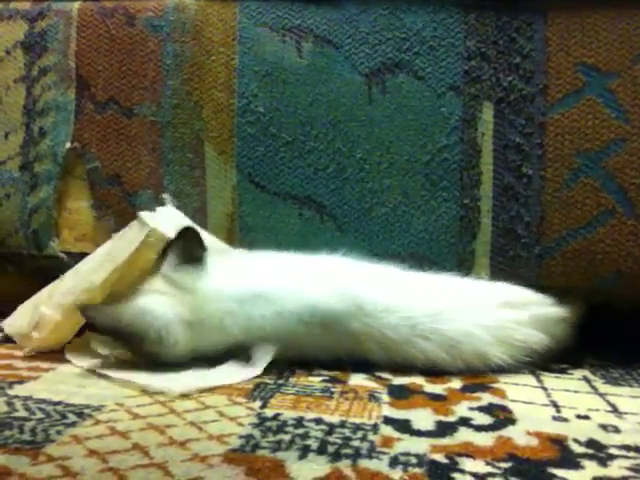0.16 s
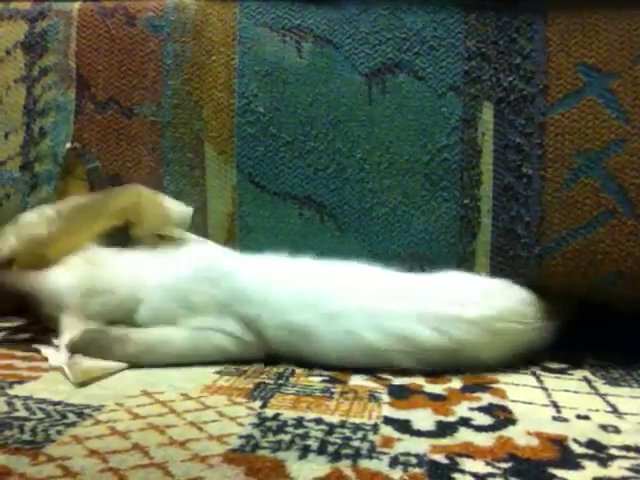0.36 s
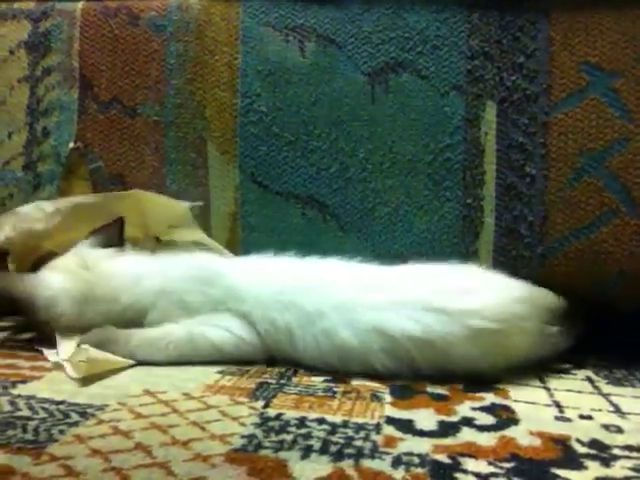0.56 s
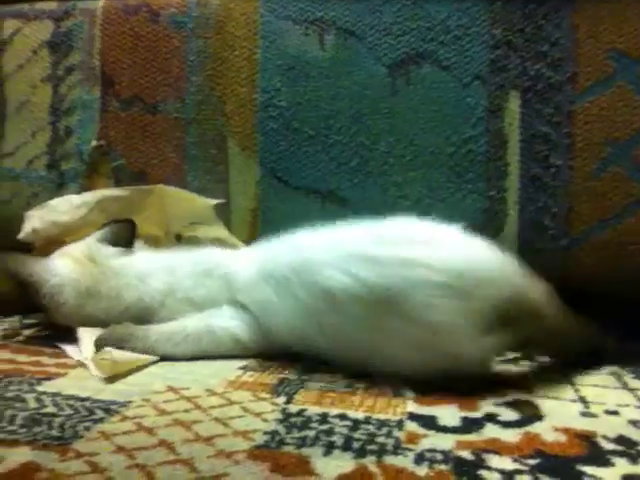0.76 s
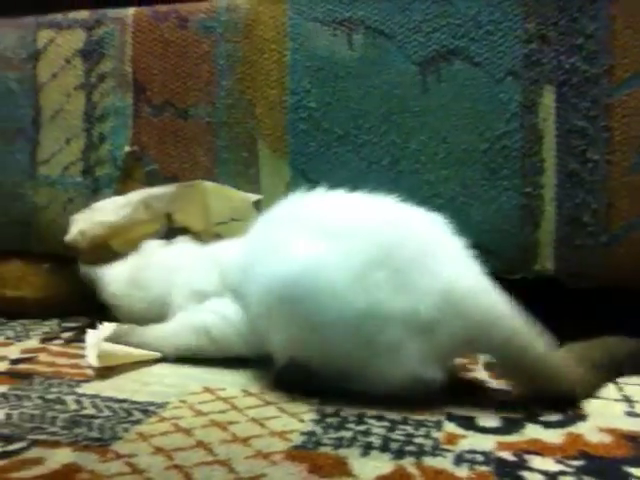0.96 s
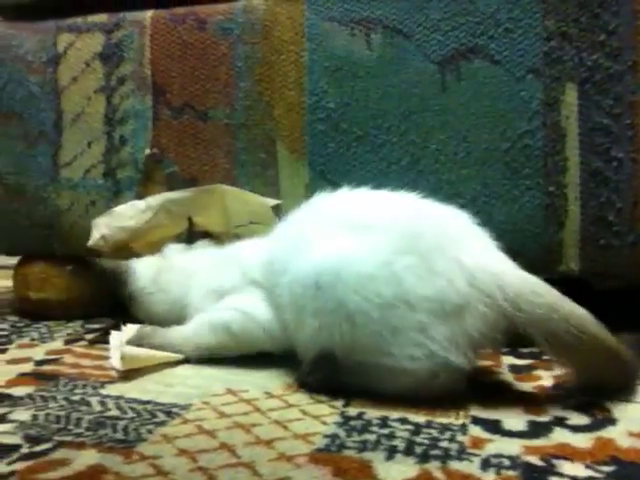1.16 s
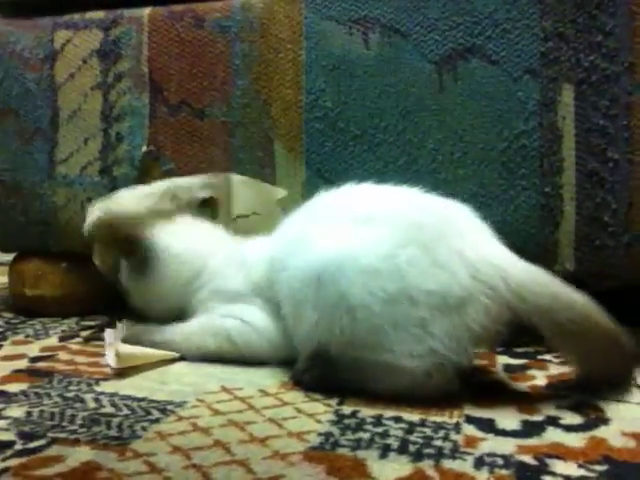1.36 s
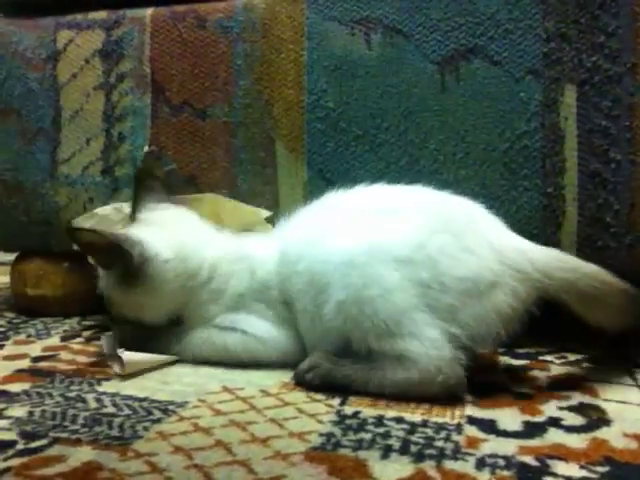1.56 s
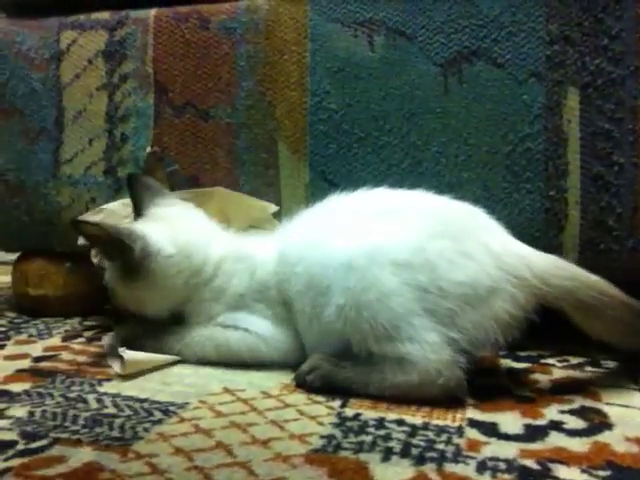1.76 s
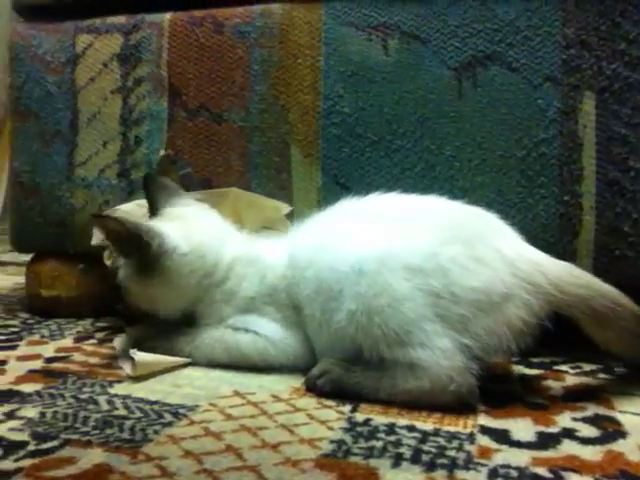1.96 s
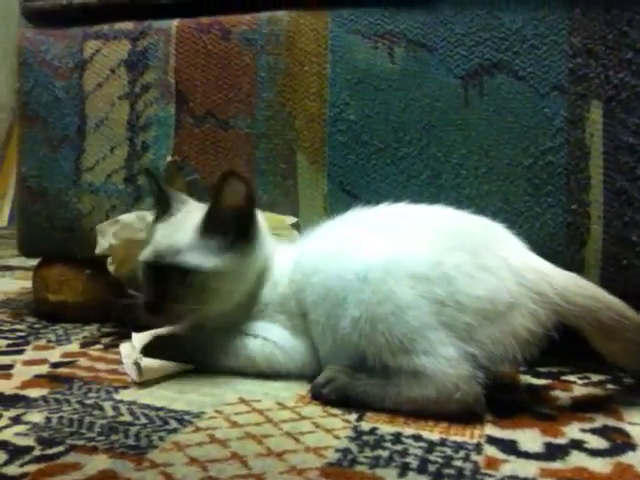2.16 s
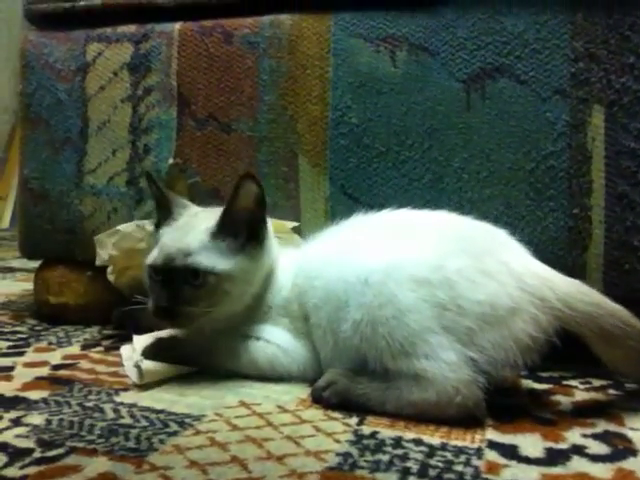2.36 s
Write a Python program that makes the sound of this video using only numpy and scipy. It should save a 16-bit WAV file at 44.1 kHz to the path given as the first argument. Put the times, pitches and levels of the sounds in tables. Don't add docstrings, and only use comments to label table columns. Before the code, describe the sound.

A crumpled paper bag crackles close to a small microphone: a kitten's hardest tugs come first, then a brief drag over carpet, weaker tugs and a last flick, over hissy room tone.

```python
import sys
import numpy as np
from scipy import signal
from scipy.io import wavfile
from scipy.ndimage import uniform_filter1d

SR = 44100
rng = np.random.default_rng(int(sys.argv[2]) if len(sys.argv) > 2 else 0)


def wav_record(signal):
    frames = np.transpose(np.atleast_2d(signal))
    bounded = np.clip(frames, -1, 1)
    quanta = np.round(bounded * 32767).astype(np.int16)
    wavfile.write(sys.argv[1], SR, quanta)


def linear_from_db(decibels):
    return 10 ** (np.asarray(decibels, float) / 20)


N = 105840


def evened(x):
    return x / np.sqrt(np.mean(x ** 2) + 1e-20)


def coloured(x, spectrum):
    spectrum_hz, spectrum_db = np.transpose(spectrum)
    bin_hz = abs(np.fft.fftfreq(8192, 1 / SR))
    gain_db = np.interp(np.log(bin_hz + 1), np.log(spectrum_hz + 1), spectrum_db, left=-60, right=-60)
    log_gain = gain_db * np.log(10) / 20
    taps = np.fft.ifft(np.exp(np.conj(signal.hilbert(log_gain)))).real[:4096]
    return signal.oaconvolve(x, taps)[:len(x)]


def ring_twice(x, hz, width_hz):
    b, a = signal.iirpeak(hz, hz / width_hz, SR)
    return signal.lfilter(b, a, signal.lfilter(b, a, x))


def add(mix, start_s, sound):
    part = mix[round(start_s * SR):][:len(sound)]
    part += sound[:len(part)]


def control(points):
    return linear_from_db(np.interp(np.arange(N) / SR, *np.transpose(points)))


def smoothed(x, size, axis=0):
    return uniform_filter1d(x, size=size, axis=axis)


def clicks(per_s, spread_db):
    present = rng.random(N) < per_s / SR
    sign = rng.choice([-1., 1.], N)
    size = linear_from_db(spread_db * np.minimum(rng.exponential(1, N), 4))
    return evened(present * sign * size)


def room_tone():
    # frequency in Hz, density in dB per Hz.
    tone_spectrum = [(12, 3), (60, -0.5), (185, -2), (450, -11.5), (1160, -24), (3000, -21.5), (11000, -24),
                     (15600, -27.5)]
    tone_db, patch_db = -56.5, 1.44
    noise = evened(coloured(rng.standard_normal(N), tone_spectrum))
    _, _, z = signal.stft(noise, nperseg=1024)
    patches = evened(smoothed(smoothed(rng.standard_normal(z.shape), 10), 5, axis=1))
    _, drifting = signal.istft(z * linear_from_db(patch_db * patches), nperseg=1024)
    return linear_from_db(tone_db) * evened(drifting[:N])


def whine():
    # frequency in Hz, rms level in dB.
    whine_lines = [(15278, -86)]
    t = np.arange(N) / SR
    return sum(np.sqrt(2) * linear_from_db(db) * np.sin(2 * np.pi * hz * t) for hz, db in whine_lines)


def drag():
    # frequency in Hz, density in dB per Hz.
    fizz_spectrum = [(1470, -68), (2500, -19), (2750, 6.5), (3850, -8), (5290, -3.5), (5810, -5),
                     (9420, -8), (14000, -33)]
    # time in seconds, sliding effort in dB.
    slide_effort = [(0, -97), (.09, -63), (.14, -57), (.21, -66), (.26, -52), (.34, -51), (.42, -59),
                    (.46, -56.5), (.545, -53.5), (.58, -65), (.86, -60.5), (.93, -47), (1.02, -56.5),
                    (1.07, -82), (1.41, -66), (1.47, -63), (1.7, -70.5), (2.4, -80)]
    drag_db, nap_db, nap_lag_s = -7.5, -11, 0.02
    fibres = clicks(per_s=9000, spread_db=-5.5)
    fizz = evened(coloured(fibres, fizz_spectrum)) * control(slide_effort)
    nap = evened(ring_twice(fibres, hz=5250, width_hz=900))
    nap_effort = control([(s + nap_lag_s, db) for s, db in slide_effort])
    return linear_from_db(drag_db) * (fizz + linear_from_db(nap_db) * nap * nap_effort)


def rustle():
    # frequency in Hz, density in dB per Hz.
    bag_spectrum = [(35, -70), (60, -0.5), (197, -1), (342, 2.5), (686, -7.5), (971, -3), (2340, -12),
                    (5310, -25), (8000, -31.5), (10400, -46), (17600, -120)]
    # time in seconds, effort on the paper in dB.
    paw_effort = [(0, -69), (.13, -56), (.2, -57), (.31, -41), (.4, -49), (.57, -51), (.63, -60),
                  (.84, -57.5), (.92, -51), (1.04, -54), (1.11, -64.5), (1.4, -67), (1.45, -56),
                  (1.68, -56.5), (1.71, -64.5), (2.08, -69), (2.12, -58.5), (2.4, -68.5)]
    rustle_db, clump_db = 2, 1.0
    clumps = evened(smoothed(smoothed(rng.standard_normal(N), 200), 200))
    creases = clicks(per_s=7000, spread_db=1.5) * linear_from_db(clump_db * clumps)
    return linear_from_db(rustle_db) * evened(coloured(creases, bag_spectrum)) * control(paw_effort)


def crunch(level_db, hz, length_s):
    upper_ratio, upper_db, fade_db = 1.924, -6.5, -4.5
    width_hz = 0.43 * hz
    cracks = rng.standard_normal(4000) ** 3
    u = np.arange(len(cracks)) / SR / length_s
    drive = cracks * np.minimum(u * 10, 1) * linear_from_db(fade_db * u ** 2)
    low = ring_twice(drive, hz, width_hz)
    high = ring_twice(drive, upper_ratio * hz, width_hz)
    sound = low + linear_from_db(upper_db - 2.9 * u) * high
    return linear_from_db(level_db) * sound / np.sqrt(np.mean(sound[u < 1] ** 2))


def crunches():
    # start in seconds, level in dB, lower band in Hz, length in seconds.
    crunch_rows = [(0.112, -61, 1300, 0.051), (0.105, -56.5, 2850, 0.0052), (0.337, -53.5, 3180, 0.028),
                   (0.393, -57.5, 3030, 0.019), (0.888, -57.5, 1390, 0.079), (1.542, -62, 2440, 0.0049),
                   (2.104, -56, 2500, 0.011), (0.332, -54, 1320, 0.06), (0.382, -54, 1040, 0.052),
                   (.475, -54, 1390, 0.047), (0.526, -47.5, 1090, 0.024), (0.61, -56, 1500, 0.0073),
                   (1.057, -61, 414, 0.021), (1.433, -60, 1055, 0.012), (1.47, -57, 1120, 0.0053),
                   (.93, -62, 5100, 0.058), (1.569, -57, 1280, 0.028), (1.626, -59, 1280, 0.0066),
                   (1.659, -54.5, 1330, 0.013), (1.675, -58, 1990, 0.0075), (2.102, -50.5, 1360, 0.012),
                   (2.128, -57, 1250, 0.013), (2.15, -63, 1110, 0.017), (2.166, -66, 1400, 0.02),
                   (2.19, -61.5, 1010, 0.014), (2.253, -66.5, 1190, 0.02), (0.234, -63.5, 6700, 0.046),
                   (0.295, -63.5, 7000, .025), (.525, -67, 6500, .022), (0.347, -62, 5240, 0.056),
                   (1.529, -64, 650, 0.099)]
    mix = np.zeros(N)
    for start_s, *settings in crunch_rows:
        add(mix, start_s, crunch(*settings))
    return mix


def snap(peak_db, hz, ring_s):
    upper_ratio, upper_db, rise = 1.58, -6, 0.24
    burst_db, burst_s = -10, 0.001
    t = np.arange(0, 4 * ring_s, 1 / SR)
    shape = (1 - np.exp(-(t / (rise * ring_s)) ** 2)) * np.exp(-2 * t / ring_s)
    lower = np.sin(2 * np.pi * hz * t)
    upper = linear_from_db(upper_db - 2.7 * hz / 1000) * np.sin(2 * np.pi * upper_ratio * hz * t)
    burst = linear_from_db(burst_db) * np.sin(2 * np.pi * 1.237 * hz * t) * np.exp(-(t / burst_s - 1.5) ** 2)
    return linear_from_db(peak_db) * (shape / shape.max() * (lower + upper) / 1.49 + burst)


def snaps():
    # start in seconds, peak in dB, lower mode in Hz, ring in seconds.
    crease_rows = [(0.11, -44.5, 2880, 0.0033), (.179, -50, 2800, 0.0026), (.221, -28.5, 1110, 0.002),
                   (0.226, -39, 1800, 0.0034), (0.246, -39, 960, 0.0044), (.287, -34, 985, 0.0065),
                   (.319, -24.5, 1050, 0.0039), (.329, -39.5, 2850, 0.0036), (.407, -38, 1130, 0.0025),
                   (.416, -44.5, 3230, .003), (.435, -34.5, 1550, 0.0026), (.459, -38, 1290, 0.0037),
                   (0.47, -28.5, 1270, 0.0016), (.482, -36, 1340, .003), (.489, -33, 1100, 0.0027),
                   (.505, -40, 2410, 0.0018), (.511, -35, 1290, 0.0018), (.537, -43, 1100, 0.004),
                   (.544, -44, 1500, 0.0023), (.545, -46, 4200, 0.0017), (.548, -39, 1170, 0.0028),
                   (0.574, -32.5, 1400, 0.0024), (.58, -36.5, 1490, 0.002), (.611, -44, 1400, 0.0026),
                   (.619, -47, 1590, .002), (0.668, -38, 2050, 0.0017), (0.67, -43.5, 1120, 0.0032),
                   (.668, -48, 3640, .001), (0.923, -41, 1080, 0.0031), (.931, -42, 2070, 0.0031),
                   (1.09, -43, 1000, 0.0072), (1.239, -54.5, 1140, 0.0063), (1.38, -48, 1080, 0.0037),
                   (1.441, -44, 734, 0.0045), (1.49, -48, 1050, 0.0033), (1.527, -55, 1000, 0.0027),
                   (1.542, -45, 3140, 0.0039), (1.543, -43, 5200, 0.0014), (1.542, -41.5, 1140, 0.0034),
                   (1.573, -47, 1350, 0.0036), (1.586, -47, 2970, 0.0036), (1.59, -36.5, 1070, 0.0016),
                   (1.661, -40, 1930, 0.002), (1.756, -47.5, 1000, 0.0034), (2.108, -42.5, 4090, 0.0024),
                   (2.108, -37, 1440, 0.0025), (2.112, -40, 1490, 0.0038), (2.116, -33, 1250, 0.0024),
                   (2.122, -41, 1380, .003), (2.171, -65, 2900, 0.0024),
                   (0.109, -49.5, 4150, 0.0033), (1.468, -41, 1115, .004), (1.498, -50, 1080, 0.0034),
                 (1.543, -47, 1900, 0.0017), (1.593, -46, 2600, .003), (1.659, -48, 1300, .002),
                 (.923, -42, 2100, .002), (.943, -45, 1300, .002), (.904, -47, 1200, .003),
                 (.35, -38, 1200, 0.0022), (.28, -38, 1100, .002), (1.666, -44, 1310, 0.0036),
                 (1.676, -44, 1980, 0.0033), (2.111, -49, 2640, 0.005), (2.118, -49, 2580, 0.0045),
                 (2.128, -38, 1470, 0.0022), (2.136, -44, 1320, .003), (2.178, -45, 1250, .003),
                 (2.182, -46, 1280, 0.0057), (2.197, -46, 1070, 0.0036), (2.261, -51, 1260, 0.0044)]
    mix = np.zeros(N)
    for start_s, *settings in crease_rows:
        add(mix, start_s, snap(*settings))
    return mix


def pop(peak_db, hz, ring_s):
    sag, rise, damping = 0.18, 0.049, 0.73
    u = np.arange(0, 2 * ring_s, 1 / SR) / ring_s
    shape = np.minimum(u / rise, 1) * np.exp(-damping * u - u ** 4)
    turns = np.cumsum(hz * (1 - sag * np.minimum(u, 1))) / SR
    overtone = 0.063 * np.exp(-2 * u) * np.sin(2 * np.pi * 2.76 * turns)
    return linear_from_db(peak_db) * shape * (np.sin(2 * np.pi * turns) + overtone)


def pops():
    # start in seconds, peak in dB, start pitch in Hz, ring in seconds.
    pop_rows = [(0.606, -40, 126, 0.019), (0.223, -41.5, 167, 0.02), (.246, -32.5, 310, 0.0062),
                (.279, -35.5, 395, 0.0076), (0.306, -27.5, 411, 0.01), (.319, -23, 369, 0.0067),
                (0.297, -42.5, 164, 0.096), (0.345, -44, 260, .025), (0.387, -41.5, 274, 0.024),
                (.414, -27.5, 185, 0.0068), (0.476, -28, 236, 0.0078), (.477, -31.5, 113.5, 0.041),
                (0.518, -35.5, 400, 0.011), (.532, -38, 193, 0.014), (0.554, -40.5, 640, 0.021),
                (0.574, -33.5, 325, 0.023), (0.597, -36, 168, 0.0093), (0.682, -41.5, 124, 0.012),
                (0.893, -47.5, 135, 0.061), (0.924, -39.5, 276, 0.011), (1.045, -40, 170, 0.0076),
                (1.0541, -32.5, 258, 0.0075), (1.062, -45, 327, 0.016), (1.064, -36.5, 104, 0.036),
                (1.174, -40.5, 230, 0.005), (1.438, -44.5, 273, 0.011), (1.492, -43.5, 440, 0.018),
                (1.544, -49.5, 326, 0.019), (1.569, -43, 101, 0.058), (1.586, -51, 297, 0.005),
                (1.607, -49, 460, 0.014), (1.662, -48, 370, 0.016), (2.118, -47.5, 420, 0.018)]
    mix = np.zeros(N)
    for start_s, *settings in pop_rows:
        add(mix, start_s, pop(*settings))
    return mix


def room(x):
    room_db, t60_s = -12.5, 0.17
    t = np.arange(round(0.3 * SR)) / SR
    present = (rng.random(len(t)) < 0.05) * (t > 0.003)
    taps = present * rng.choice([-1., 1.], len(t)) * linear_from_db(-60 * t / t60_s)
    return linear_from_db(room_db) * signal.oaconvolve(x, taps / np.linalg.norm(taps))[:N]


def scene():
    hits = crunches() + snaps() + pops()
    mid = room_tone() + whine() + drag() + rustle() + hits + room(hits)
    return np.array([mid, mid])


def top_cut(x):
    return signal.sosfilt(signal.butter(12, 15700, fs=SR, output="sos"), x)


def record(dry):
    mic_low_hz, bass_db = 60.5, -9.5
    high_pass = signal.butter(2, mic_low_hz, "high", fs=SR, output="sos")
    cut = signal.sosfilt(high_pass, dry)
    return top_cut(cut + linear_from_db(bass_db) * (dry - cut))


dry = scene()
out = record(dry)
wav_record(out)
```